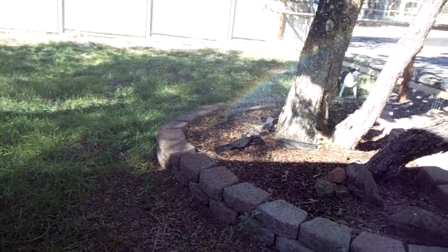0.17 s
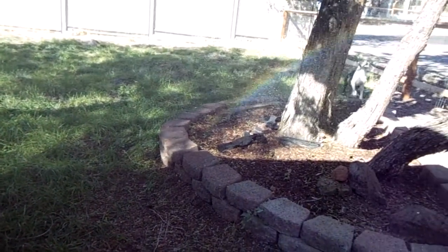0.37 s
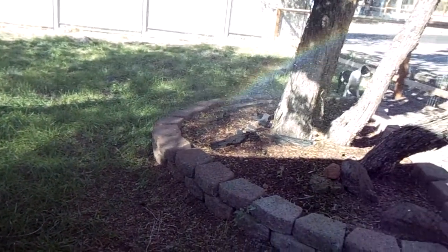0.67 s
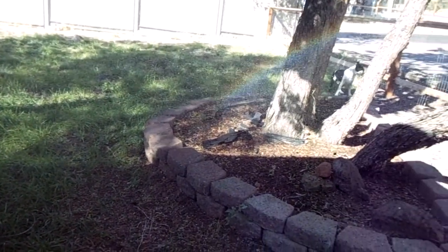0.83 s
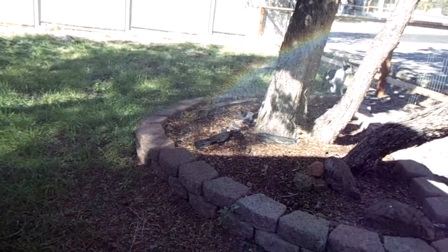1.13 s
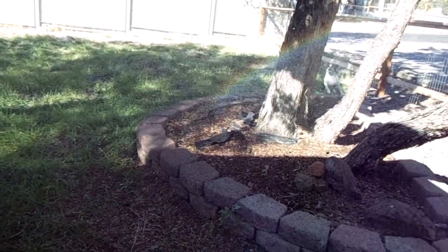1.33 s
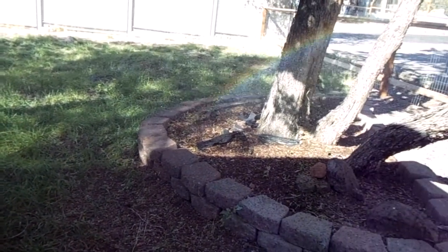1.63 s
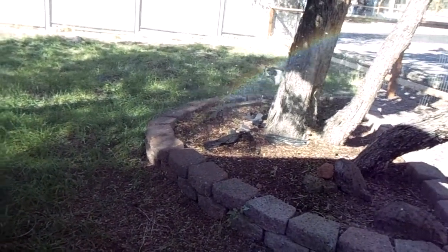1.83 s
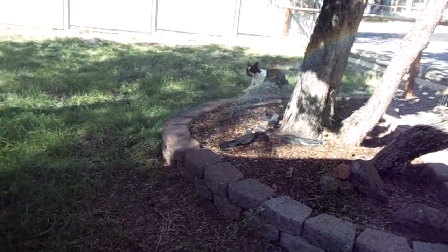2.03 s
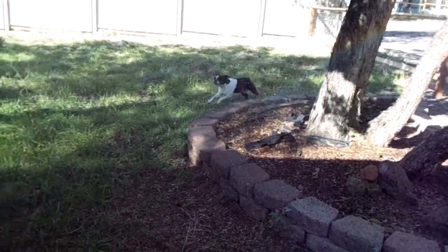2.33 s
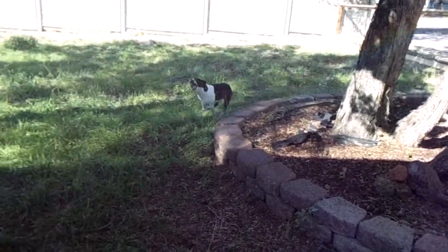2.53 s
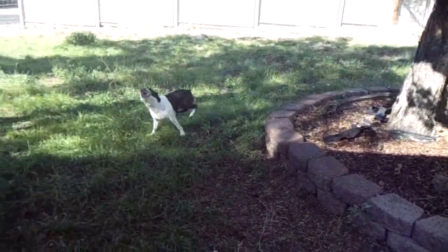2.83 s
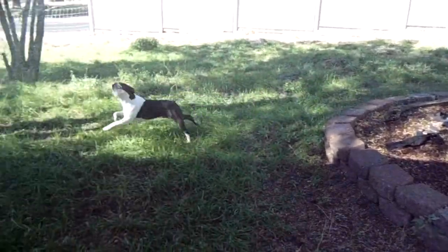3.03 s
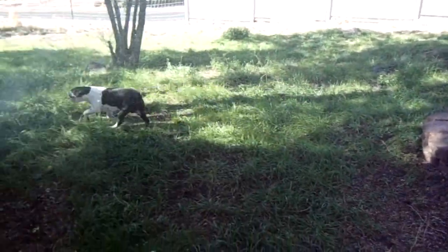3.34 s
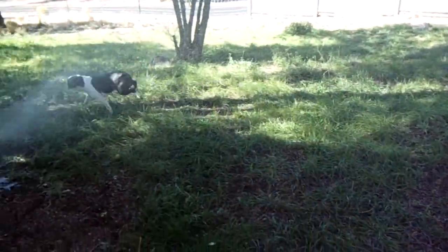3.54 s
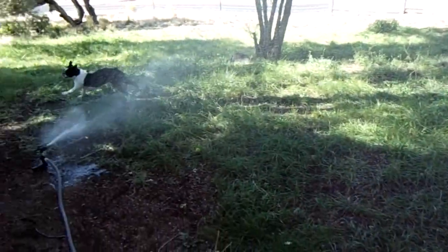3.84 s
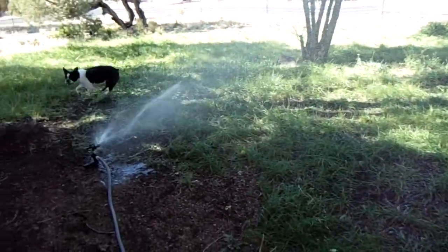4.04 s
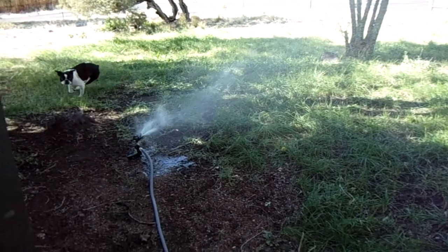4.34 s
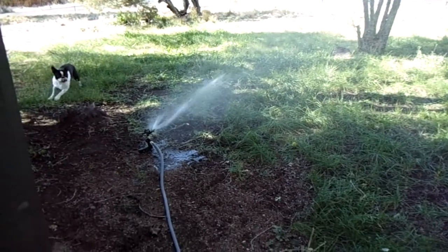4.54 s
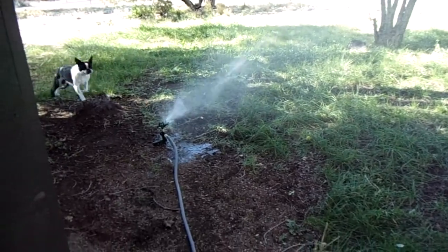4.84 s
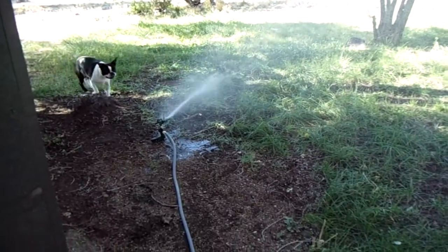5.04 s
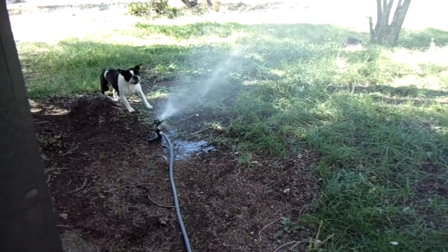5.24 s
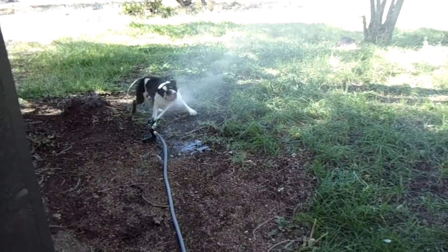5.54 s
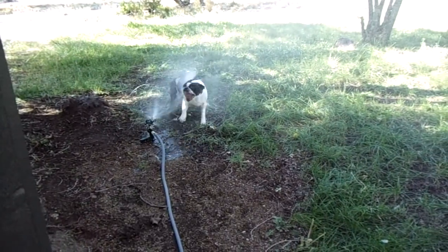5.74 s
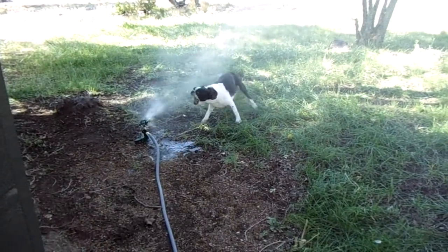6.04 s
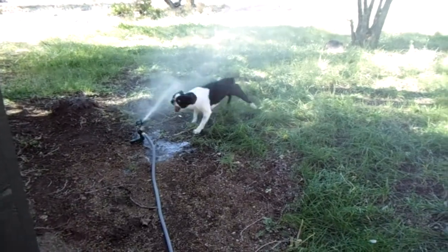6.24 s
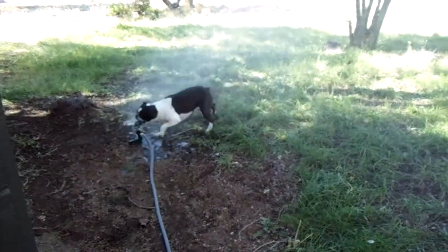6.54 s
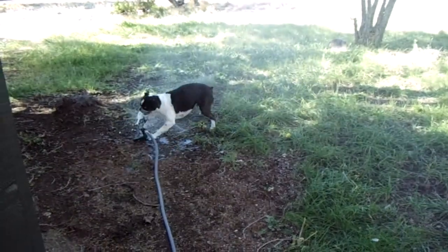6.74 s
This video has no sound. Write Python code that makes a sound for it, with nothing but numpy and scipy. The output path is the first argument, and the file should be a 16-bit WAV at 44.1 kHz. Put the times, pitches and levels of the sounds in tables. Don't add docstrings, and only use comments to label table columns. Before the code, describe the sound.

Fast ticking sprinkler hiss in a yard, low buffeting wind thumps, brief drumming of spray on a dog, then splashy, gurgling slops at the nozzle.

```python
import sys
import numpy as np
from scipy import signal
from scipy.fft import rfft, irfft, next_fast_len
from scipy.io import wavfile
from scipy.ndimage import uniform_filter1d

SR = 44100
rng = np.random.default_rng(int(sys.argv[2]) if len(sys.argv) > 2 else 0)


def invert_db(x):
    u = np.asarray(x, float) / 20
    return 10 ** u


def dump(signal):
    limited = np.clip(np.atleast_2d(signal).T, -1, 1)
    pcm = np.round(limited * 32767).astype(np.int16)
    wavfile.write(sys.argv[1], SR, pcm)


N = 303849

# time_s, turns_so_far
SPINNER_TURNS = [(-0.036, -3), (0.722, 9), (1.099, 15), (1.649, 24), (2.006, 30), (2.546, 39), (2.896, 45),
                 (3.25, 51), (3.772, 60), (4.113, 66), (4.617, 75), (5.128, 84), (5.302, 87), (5.985, 99),
                 (6.334, 105), (6.851, 114)]
# time_s, level_db, facing (0 away, 1 turning, 2 side-on, 3 towards, 4 past),
# puff_share (0-1, spinner running)
JET = [(0, -31, 0.13, 0.95), (1, -32.5, .05, 0.87), (1.25, -31, 0.04, 0.79), (1.5, -31.5, 0.045, 0.64),
       (2, -32, .05, 0.86), (2.4, -31.5, 0.46, 0.85), (2.8, -31.5, 0.39, 0.81), (3.2, -31, 1.4, 0.66),
       (3.6, -31.5, 1.8, 1), (4, -30.5, 2.37, 0.88), (4.3, -28.5, 3.4, 0.93), (5.4, -29, 3.4, 0.72),
       (5.8, -27, 3.55, 0.56), (6.1, -30, 3.86, 1), (6.45, -30, 3.3, 0.69), (6.6, -28.5, 3.95, 0.11),
       (6.9, -21.5, 3.6, 0.043)]
# pitch_hz, peak_half_width_turns, shelf_share, shelf_start_turns, shelf_end_turns
PUFF_OUTLINE = [(1500, 0.039, 0.11, -0.29, 0.17), (3000, 0.18, 0.26, -0.25, 0.16),
                (5170, 0.13, 0.18, -0.27, 0.15), (7500, 0.11, 0.13, -0.29, 0.17),
                (10800, 0.23, 0.43, -0.16, 0.16), (13000, .12, 0.7, -0.32, 0.21)]
# pitch_hz, density_db_per_hz
PUFF_COLOURS = [
    [(1400, -16.5), (2900, -9), (4200, -14), (4750, -12.5), (5200, 1), (5550, -1), (6150, -12.5),
     (7100, -2.5), (8800, -12.5), (10300, -10.5), (12000, -18.5), (14200, -22)],
    [(1200, -21), (2350, -5.5), (3000, -8), (3800, -22.5), (5250, 5.5), (6200, -18.5), (7200, 2.5),
     (8100, -15.5), (10200, -5.5), (11200, -8), (13500, -12), (14200, -21)],
    [(1000, -18), (2300, -4.5), (3000, -10.5), (3700, -10.5), (4700, -3), (5750, -1.5), (6900, -2),
     (7500, 2), (8700, -15), (9900, -7), (11000, -12), (14200, -14)],
    [(1000, -28), (2000, -11.5), (2950, -9.5), (3700, -13.5), (5100, 1.5), (5900, -13.5), (6800, 2.5),
     (7600, -11.5), (8100, -8.5), (9400, -9.5), (12500, -15.5), (14200, -17)],
    [(1000, -15), (2000, -19.5), (3000, -4.5), (3800, -10.5), (5100, -1.5), (5850, -10), (6300, -11),
     (7700, -5.5), (9400, -10.5), (10600, -18.5), (11500, -15), (14200, -21)],
]
# pitch_hz, density_db_per_hz
MIST_COLOURS = [
    [(1000, -28), (1400, -30), (2200, -20), (3200, -18), (4500, -22.5), (5500, -11.5), (6200, -25.5),
     (7000, -14.5), (8500, -21), (10500, -19.5), (12000, -19.5), (14200, -22.5)],
    [(1100, -29.5), (1500, -23.5), (2300, -12), (3200, -20), (4200, -18.5), (5400, -12.5), (6200, -15.5),
     (7000, -13), (8500, -18), (10000, -17), (12000, -21), (14200, -28)],
    [(1000, -31), (1500, -21), (2100, -21), (3000, -16), (3700, -21), (5000, -15.5), (6000, -19),
     (7000, -18.5), (8500, -17.5), (10000, -19.5), (12000, -23.5), (14200, -22.5)],
]
# pitch_hz, density_db_per_hz
LANDING_COLOUR = [(3500, -26.5), (5500, -10.5), (6200, -13), (7050, -9), (9000, -17)]
# turn, level_db
UNEVEN_TURNS = [(13, 2.5), (16, -0.5), (17, 0), (18, 1.5), (25, -1), (26, -3), (35, 1.5), (42, 0.5),
                (43, -0.5), (48, 1), (57, -3.5), (65, -2), (67, -0.5), (70, 0), (72, -3), (75, 1.5),
                (79, 1), (84, -1), (89, 2.5), (95, 0.5), (96, -0.5), (105, -1.5)]

# time_s, level_db, gurgle_relative_db
GUSH = [
    (6.48, -51, -9),
    (6.492, -39, -18),
    (6.544, -21, -46),
    (6.56, -27, -18),
    (6.688, -25, -13),
    (6.706, -17, -20),
    (6.81, -29.5, -20),
    (6.868, -38, -20),
    (6.89, -50, -1),
]
# pitch_hz, density_db_per_hz
GUSH_COLOUR = [(710, -49), (1200, -5.5), (1300, -24), (1770, -10), (3000, 3), (3870, -8.5), (4760, 4.5),
               (5330, 1.5), (5900, -11), (6750, -4.5), (8040, -7), (14000, -18.5)]
# pitch_hz, density_db_per_hz
GURGLE_COLOUR = [(150, -13), (350, -4), (700, 1.5), (1100, -2), (1500, -22)]
# start_s, level_db, length_s, pitch_factor
FLANK_HITS = [
    (5.668, -23.5, 0.026, 0.97),
    (5.729, -25.5, 0.022, 1.08),
    (5.783, -43, .035, 0.91),
]
# pitch_hz, relative_db, length_share, lag_s
FLANK_RESONANCES = [(1490, -10, 1.4, 0.00067), (2740, -2.5, 0.77, .001), (3850, -7, .85, .001),
                    (7500, -3, 1, 0.0014)]
# start_s, level_db, pitch_hz, length_s
BITES = [(6.492, -29, 6500, 0.024), (6.522, -38, 5000, 0.033), (6.523, -29, 2370, 0.036),
         (6.573, -37.5, 1600, 0.03), (6.6, -36.5, 1140, .039), (6.622, -29, 4700, 0.028),
         (6.639, -39, 1070, 0.023), (6.682, -34, 350, 0.034), (6.689, -26, 5000, 0.034),
         (6.698, -28, 3000, 0.033), (6.732, -36.5, 704, 0.019), (6.738, -31, 2880, .025),
         (6.743, -25, 7500, 0.022), (6.762, -25, 7500, 0.017), (6.629, -30, 7000, 0.0071),
         (6.828, -26, 7500, 0.014), (6.825, -27, 4340, 0.02), (6.85, -31, 1730, 0.03)]
# start_s, level_db, pitch_hz, length_s
LAWN_KNOCKS = [(0.951, -34, 6500, 0.016), (1.41, -52, 880, 0.12), (1.438, -44, 1150, 0.044),
               (1.473, -47, 1240, 0.03), (3.121, -46.5, 640, .03), (4.688, -46, 297, 0.026),
               (4.719, -43.5, 715, 0.038), (5.26, -43, 1230, 0.03), (5.387, -39.5, 334, 0.025),
               (5.722, -40, 1500, 0.016), (5.75, -36, 1340, 0.011), (5.743, -32, 8000, 0.028),
               (5.783, -41, 1400, 0.013), (5.8, -45, 1450, .016)]
# start_s, peak_db, pitch_hz
FAT_DROPS = [(2.6628, -18, 5030), (3.016, -17, 5320), (3.131, -10, 5100), (4.5057, -18, 5010),
             (4.6168, -10, 4740), (4.9018, -12, 5050), (4.9566, -12, 4660), (5.017, -12, 5060),
             (5.672, -14, 2690), (5.6824, -15, 2840), (5.69, -6, 2800), (5.741, -12, 4120),
             (6.5256, -14, 5230), (6.534, -9, 4460), (6.629, -14, 4510), (6.7056, -10, 5070),
             (6.71, -13, 3280), (6.7484, -9, 2900), (6.754, -13, 2980), (6.8309, -18, 4380),
             (6.8634, -10, 4530)]

# time_s, strength_db, turbulence_db
WIND = [(0, -26.5, -6), (.3, -34.5, -3.5), (.5, -31, -1.5), (1, -31, -5.5), (1.3, -35, 2.5), (2.1, -44, 10),
        (2.5, -30, -5), (3, -33, 5.5), (3.15, -29, 2), (3.45, -27.5, 6), (3.75, -21, -7), (4.1, -26.5, -5),
        (4.6, -30, -12), (5.3, -27.5, -4), (5.5, -27, 0.5), (6.2, -27, 1), (6.55, -26, -6), (6.8, -19, -5)]
# pitch_hz, density_db_per_hz
HEAVE_COLOUR = [(3, 7.5), (8, -7), (18, -0.5), (30, -12)]
# pitch_hz, density_db_per_hz
BUFFET_COLOUR = [(15, -15.5), (24, -1), (45, -4.5), (75, -19.5)]
# pitch_hz, density_db_per_hz
FLUTTER_COLOUR = [(40, -30), (58, 12), (100, -4), (150, -16.5), (250, -23)]
# start_s, peak_db, pitch_hz
WIND_PULSES = [(3.023, -26, 73), (3.098, -18.0, 73), (3.191, -21, 55), (3.225, -18.5, 72),
               (3.259, -16.2, 48), (3.333, -27, 73), (3.369, -19, 64), (3.4, -18, 97.5), (3.483, -15, 83.5),
               (3.486, -23, 148), (3.496, -19, 48), (3.506, -20, 84), (3.537, -15, 63.5), (3.586, -20.5, 73),
               (3.657, -21, 97), (3.682, -19, 73), (3.794, -17.5, 55.5), (4.432, -24.5, 73), (5.43, -20, 64),
               (5.539, -16.5, 64), (5.586, -15.9, 55.5), (5.685, -16.5, 48), (5.695, -25, 84),
               (5.79, -14, 46.9), (5.837, -18.9, 74), (5.888, -20, 64), (5.965, -13.2, 73.4),
               (5.973, -24, 148), (5.996, -23.7, 73), (6.02, -22.9, 112), (6.041, -17, 47.7),
               (6.081, -21, 84), (6.094, -24, 130), (6.123, -20, 73), (6.147, -16, 84), (6.149, -24, 148),
               (6.181, -20, 55), (6.191, -25, 129), (6.221, -24.4, 73), (6.244, -18, 84), (6.277, -19.2, 84),
               (6.305, -21, 85), (6.342, -18, 64), (6.395, -23.3, 73), (6.622, -25, 73), (6.64, -16, 73),
               (6.699, -18, 48), (6.701, -16.4, 84), (6.724, -15, 73), (6.731, -22.1, 147), (6.759, -32, 97),
               (6.773, -23, 197), (6.773, -9.5, 112), (6.78, -24.9, 112), (6.785, -13, 55.3),
               (6.875, -17, 63),
               (0.448, -15.5, 18.3), (0.803, -19.4, 14.6), (0.961, -21, 12), (2.849, -22, 25),
              (3.068, -19, 46), (3.071, -11, 26), (3.109, -17, 23), (3.239, -10.8, 24), (3.312, -16, 27),
              (3.385, -14, 40), (3.407, -19, 15), (3.456, -15, 42), (3.517, -11, 34), (3.587, -16.4, 43),
              (3.612, -12.5, 32.5), (3.644, -12, 50), (3.65, -9.5, 15.2), (3.757, -15.5, 15),
              (3.931, -16, 14), (4.076, -20, 28), (4.167, -19, 22), (4.261, -16.5, 14), (4.385, -11.5, 25),
              (4.411, -15, 35), (4.493, -21.5, 18.3), (4.705, -14, 18), (5.069, -28, 25),
              (5.404, -12, 16.7), (5.503, -6.5, 27), (5.507, -13.6, 12), (5.576, -14, 23.5),
              (5.728, -15.4, 15), (5.736, -18.6, 37), (5.765, -14.5, 32.5), (5.824, -12.5, 19),
              (5.834, -14, 36), (5.909, -15, 16.4), (5.995, -13, 41), (6.018, -12.5, 32), (6.061, -20, 24),
              (6.088, -9.2, 16), (6.137, -16, 40), (6.18, -18, 15.8), (6.193, -12, 31), (6.255, -14, 29),
              (6.301, -10.5, 21), (6.336, -17, 45), (6.391, -17, 22), (6.498, -23, 14.6), (6.582, -15, 29),
              (6.614, -16, 14), (6.624, -15.0, 42), (6.71, -10.0, 42), (6.729, -7, 20.4), (6.76, -9, 41.5),
              (6.784, -20.8, 15),
               (1.24, -37, 90), (2.52, -28, 41), (2.529, -30, 70), (4.861, -22.5, 36.7), (4.97, -21, 31),
              (2.537, -31, 109), (2.764, -23, 239), (3.123, -28, 230), (3.432, -22, 272), (3.488, -30, 280),
              (5.986, -28, 288), (6.777, -26, 300)]

# pitch_hz, density_db_per_hz
YARD_COLOUR = [(53, -33), (90, -2.5), (157, -1), (257, -3.5), (289, -5.5), (353, -6.5), (401, -4.5),
               (514, -7.5), (970, -11.5), (1500, -18.5), (1950, -14), (3300, -120)]
# pitch_hz, density_db_per_hz
HUM_COLOUR = [(240, -21), (300, 0), (360, -17.5), (440, -4), (500, -13.5)]


def evened(x):
    return x / np.sqrt(np.mean(x ** 2) + 1e-20)


def read(points, hz, column=1):
    table = np.transpose(points)
    return np.interp(np.log(hz + 1), np.log(table[0] + 1), table[column])


def closed(points, hz, slope_db=30):
    octaves = np.log2((hz + 1) / np.clip(hz + 1, points[0][0], points[-1][0]))
    return read(points, hz) - slope_db * abs(octaves)


def blend(colours, hz, place):
    return sum(np.outer(closed(c, hz), np.maximum(1 - abs(place - k), 0)) for k, c in enumerate(colours))


def curve(rows, t, column):
    table = np.transpose(rows)
    return np.interp(t, table[0], table[column])


def coloured(points):
    size = next_fast_len(N)
    spectrum = rfft(rng.standard_normal(size))
    gain = invert_db(closed(points, np.fft.rfftfreq(size, 1 / SR)))
    return evened(irfft(spectrum * gain, size)[:N])


def patchy(shape, bands, frames):
    across = uniform_filter1d(rng.standard_normal(shape), size=bands, axis=0)
    return evened(uniform_filter1d(across, size=frames, axis=1))


def droplets(size, per_s, spread_db):
    hit = rng.random(size) < per_s / SR
    sizes = invert_db(spread_db * np.minimum(rng.exponential(1, size), 3.4))
    clicks = hit * sizes * rng.choice([-1., 1.], size)
    return evened(evened(clicks) + 0.54 * rng.standard_normal(size))


def turn_habits(bands):
    chance = rng.standard_normal((130, bands, 2))
    colour_db = 1.9 * evened(uniform_filter1d(chance[..., 0], size=3, axis=1))
    colour_db = colour_db + 0.4 * chance[:, :1, 1]
    for turn, db in UNEVEN_TURNS:
        colour_db[round(turn) + 4] += db
    late = 0.011 * evened(uniform_filter1d(chance[..., 1], size=25, axis=1))
    return colour_db, late


def puff_outline(hz, off, facing):
    width, shelf, start, end = (read(PUFF_OUTLINE, hz, column=k)[:, None] for k in range(1, 5))
    gate = (1 + np.tanh((off - start) / 0.04)) * (1 + np.tanh((end - off) / 0.07)) / 4
    peak = np.exp(-abs((off - 0.008 * facing + 0.004) / width) ** 1.5)
    return gate * (shelf + (1 - shelf) * peak)


def sprinkler():
    hz, t, z = signal.stft(droplets(N, 14000, spread_db=3.5), SR, nperseg=256, noverlap=208)
    turns = curve(SPINNER_TURNS, t, column=1)
    facing = np.clip(curve(JET, t, column=2), 0, 4)
    away = np.maximum(1 - facing / 2, 0)
    puff_db = blend(PUFF_COLOURS, hz, facing)
    mist_db = blend(MIST_COLOURS, hz, np.minimum(facing / 1.64, 2))

    colour_db, late = turn_habits(len(hz))
    which = np.round(turns).astype(int) + 4
    off = turns - np.round(turns) - late[which].T - 0.016 * np.minimum(facing, 2) + 0.013
    puffs = invert_db(puff_db + colour_db[which].T) ** 2 * puff_outline(hz, off, facing)

    fall = np.exp(-((turns % 1 - 0.33) / 0.16) ** 2)
    landing = invert_db(closed(LANDING_COLOUR, hz))[:, None] ** 2 * away * fall
    whistle = invert_db(-10.5) ** 2 * np.exp(-((hz[:, None] - 11300) / 800) ** 2)
    lead = whistle * away * np.exp(-((off + 0.27) / 0.045) ** 2)

    mist = invert_db(mist_db + 1.0 * patchy(z.shape, bands=2, frames=60)) ** 2
    running = np.clip(curve(JET, t, column=3), 0, 1)
    power = mist + running * (puffs + landing + lead)
    hiss = signal.istft(z * np.sqrt(power), SR, nperseg=256, noverlap=208)[1][:N]
    return invert_db(curve(JET, np.arange(N) / SR, column=1)) * evened(hiss)


def gush():
    t = np.arange(N) / SR
    hz, _, z = signal.stft(droplets(N, 5000, spread_db=1.5), SR, nperseg=256)
    blobs_db = 2.0 * patchy(z.shape, bands=5, frames=7)
    splash_gain = invert_db(closed(GUSH_COLOUR, hz)[:, None] + blobs_db)
    splash = signal.istft(z * splash_gain, SR, nperseg=256)[1][:N]
    gurgle = invert_db(curve(GUSH, t, column=2)) * coloured(GURGLE_COLOUR)
    flicker = invert_db(1.8 * evened(uniform_filter1d(rng.standard_normal(N), size=500)))
    fade_in = np.clip((t - GUSH[0][0]) / 0.03, 0, 1)
    return invert_db(curve(GUSH, t, column=1) - 2.5) * fade_in * flicker * (evened(splash) + gurgle)


def ring_width(hz):
    if hz < 1175:
        return hz * 0.62
    return hz * (1 if hz > 6000 else 0.2)


def spatters():
    out = np.zeros(N)
    flank = [(s + lag, db + rel_db, hz * pitch, length * share)
             for s, db, length, pitch in FLANK_HITS
             for hz, rel_db, share, lag in FLANK_RESONANCES]
    for s, db, hz, length in LAWN_KNOCKS + flank + BITES:
        size, width = int(length * SR), ring_width(hz)
        drops = droplets(size=6000, per_s=3500, spread_db=4.0)
        band = signal.butter(2, [hz - width / 2, hz + width / 2], "band", fs=SR)
        ring = signal.lfilter(*band, drops)
        i = np.arange(size)
        fade = np.minimum(i / (0.14 * size), 1) * np.minimum(i[::-1] / (0.25 * size), 1)
        part = out[round(s * SR):][:size]
        part += (invert_db(db) * evened(ring)[-size:] * fade)[:len(part)]
    return out


def fat_drops():
    out = np.zeros(N)
    for s, db, hz in FAT_DROPS:
        cycles = np.arange(400) * hz / SR
        rise = cycles / 1.8
        part = out[round(s * SR):][:len(cycles)]
        part += (invert_db(db - 8) * np.sin(2 * np.pi * cycles) * rise * np.exp(1 - rise))[:len(part)]
    return out


def steadied(x, size):
    return evened(x / (uniform_filter1d(x ** 2, size) + 0.078) ** 0.83)


def wind():
    t = np.arange(N) / SR
    strength_db, rough_db = curve(WIND, t, column=1), curve(WIND, t, column=2)
    heave = steadied(coloured(HEAVE_COLOUR), size=9000)
    lumps = steadied(coloured(BUFFET_COLOUR), size=5000)
    haste = uniform_filter1d(evened(np.gradient(lumps)) ** 2, size=500)
    flutter = steadied(coloured(FLUTTER_COLOUR) * (0.21 + haste) ** 1.02, size=6000)
    over_db = strength_db + 31.5
    buffet = invert_db(-7 + 0.34 * over_db + 0.33 * rough_db) * lumps
    flutter = invert_db(-12.5 + 0.42 * over_db + rough_db) * flutter
    return invert_db(strength_db) * (heave + buffet + flutter)


def snaps():
    out = np.zeros(N)
    for s, db, hz in WIND_PULSES:
        cycles = np.arange(int(2 * SR / hz)) * hz / SR
        fade = np.sin(np.pi * cycles / 2) * np.exp(-0.6 * cycles)
        part = out[round(s * SR):][:len(cycles)]
        part -= (invert_db(db + 2.9) * np.sin(2 * np.pi * cycles) * fade)[:len(part)]
    return out


def yard():
    facing = np.clip(curve(JET, np.arange(N) / SR, column=2), 0, 3)
    drift = uniform_filter1d(uniform_filter1d(rng.standard_normal(N), size=1200), size=1200)
    rustle = invert_db(1.4 * np.tanh(evened(drift)))
    wash = invert_db(-45.3) * evened(rustle * coloured(YARD_COLOUR))
    hums = invert_db(-57 + 2 * facing) * coloured(HUM_COLOUR)
    return wash + hums


def scene():
    water = sprinkler() + gush() + spatters() + fat_drops()
    return (water + wind() + snaps() + yard())[None]


def roll_off(x):
    return signal.sosfilt(signal.butter(12, 15040, fs=SR, output="sos"), x)


def record(dry):
    held = 0.95 * np.tanh(dry / 0.95)
    low_pass = signal.firwin(2047, 14195, window=("kaiser", 9), fs=SR)
    mix = signal.oaconvolve(held, low_pass[None], "same")
    return roll_off(mix)


dry = scene()
out = record(dry)
dump(out)
```